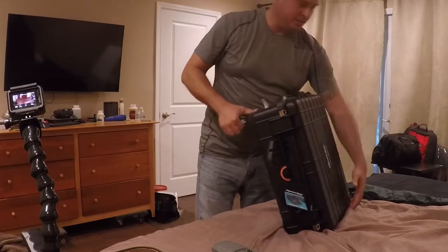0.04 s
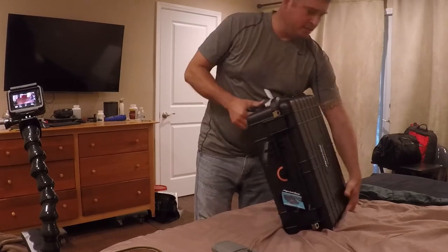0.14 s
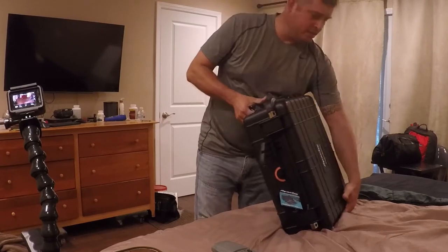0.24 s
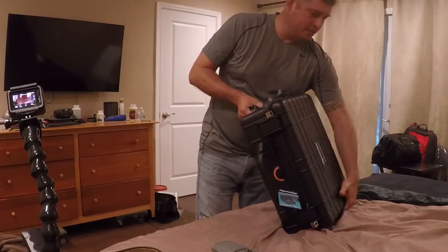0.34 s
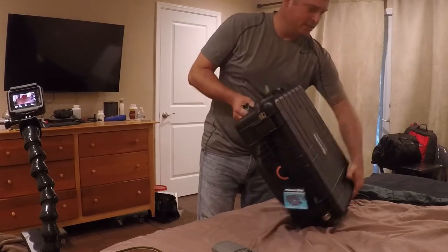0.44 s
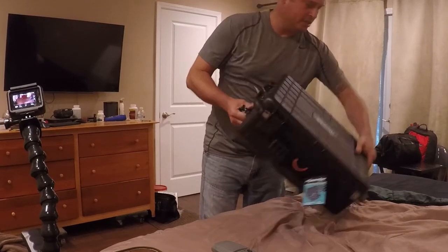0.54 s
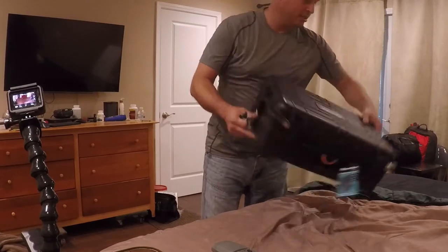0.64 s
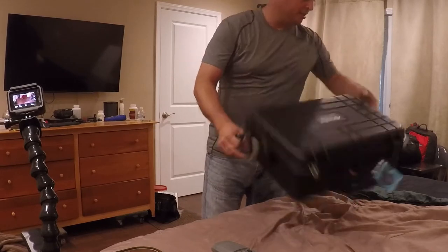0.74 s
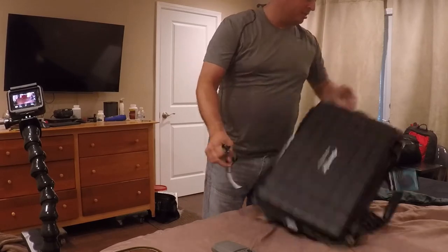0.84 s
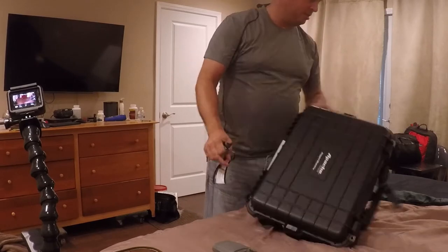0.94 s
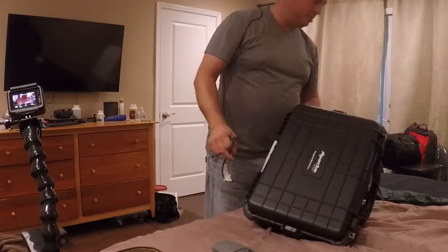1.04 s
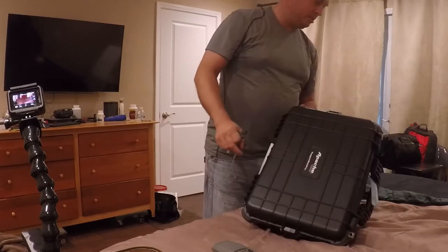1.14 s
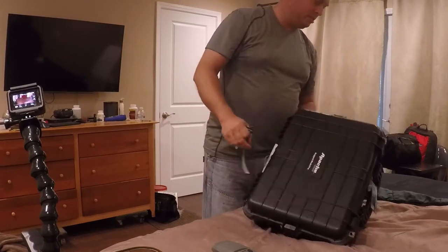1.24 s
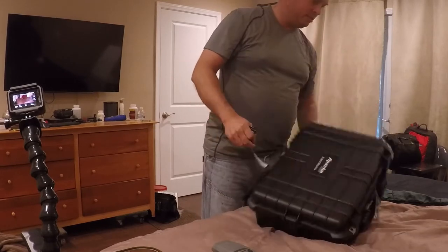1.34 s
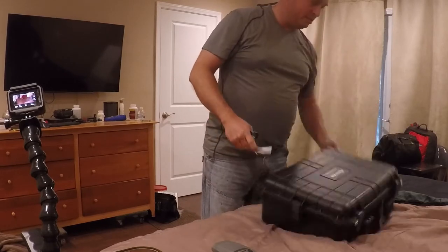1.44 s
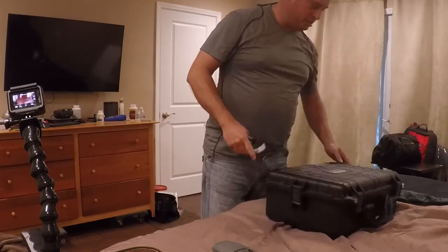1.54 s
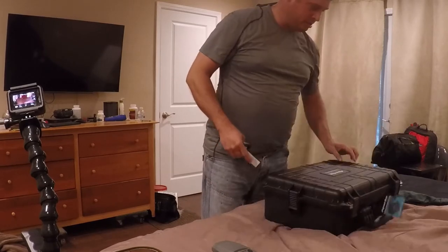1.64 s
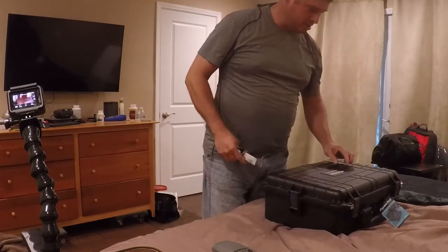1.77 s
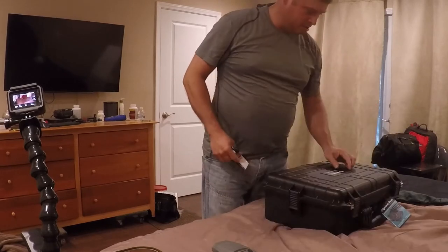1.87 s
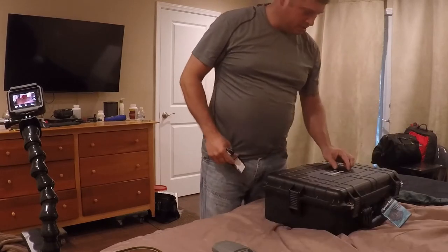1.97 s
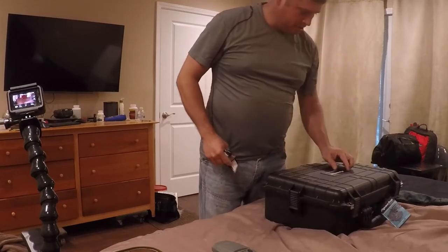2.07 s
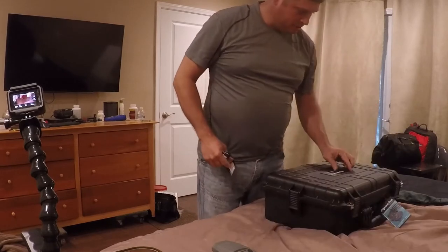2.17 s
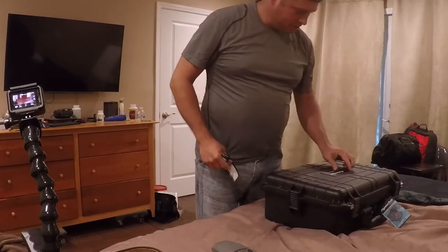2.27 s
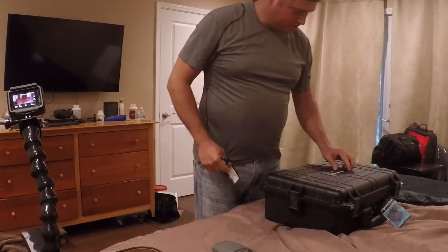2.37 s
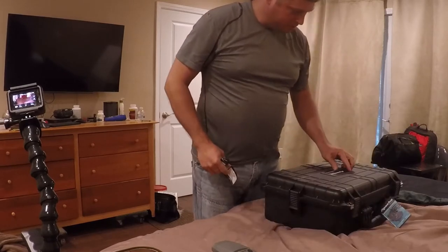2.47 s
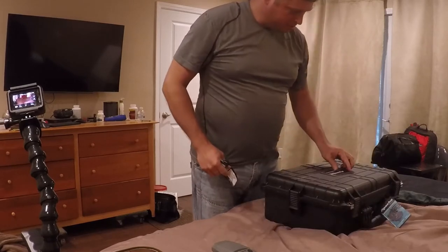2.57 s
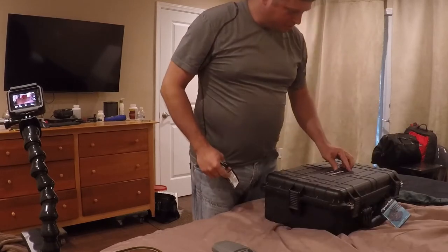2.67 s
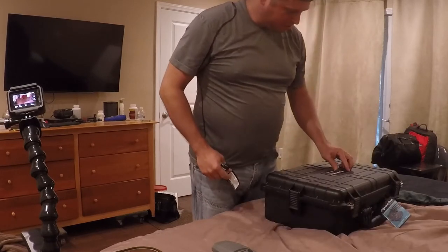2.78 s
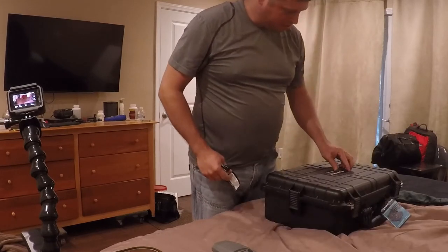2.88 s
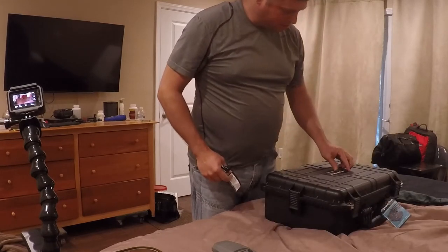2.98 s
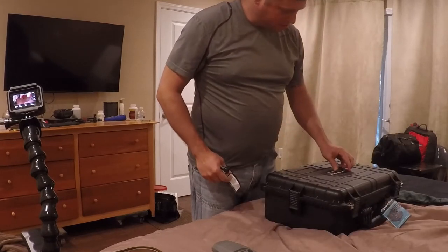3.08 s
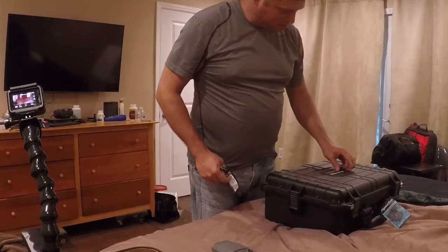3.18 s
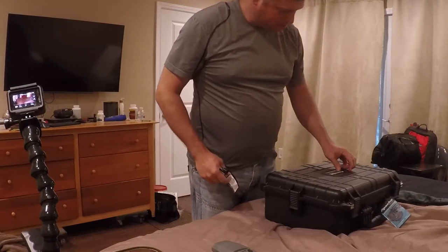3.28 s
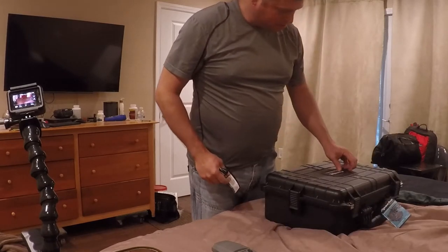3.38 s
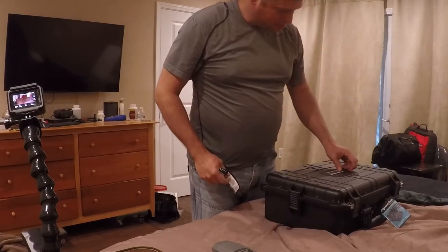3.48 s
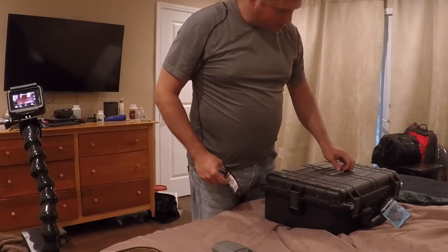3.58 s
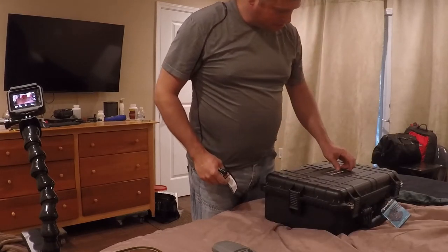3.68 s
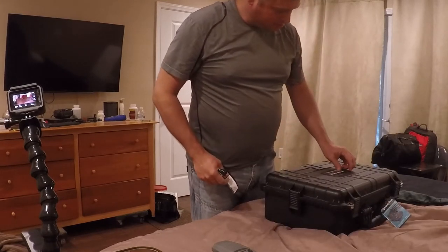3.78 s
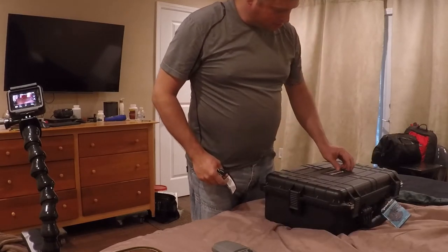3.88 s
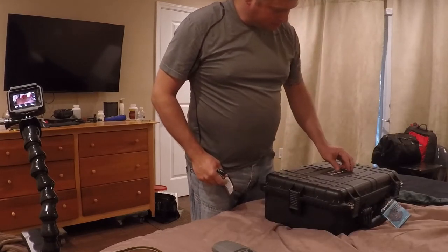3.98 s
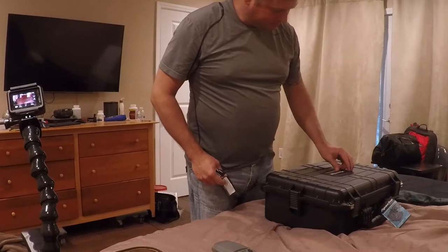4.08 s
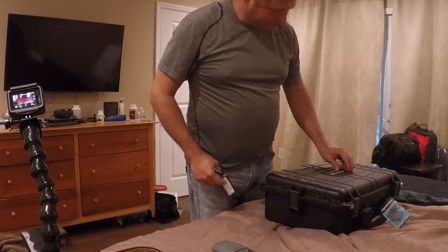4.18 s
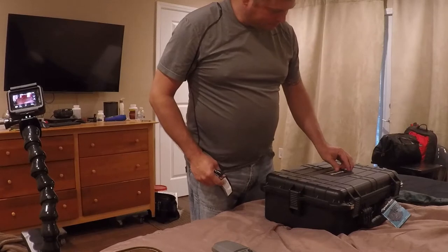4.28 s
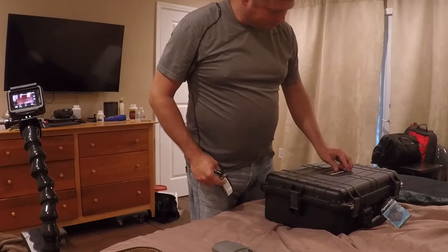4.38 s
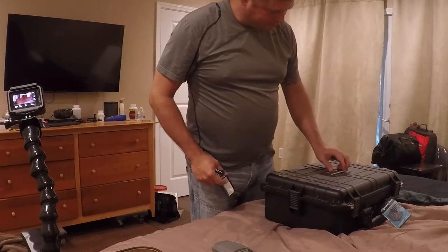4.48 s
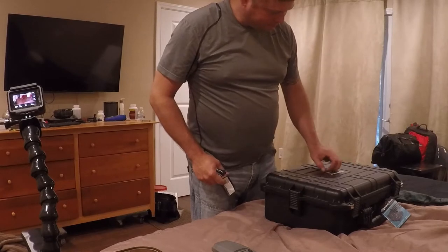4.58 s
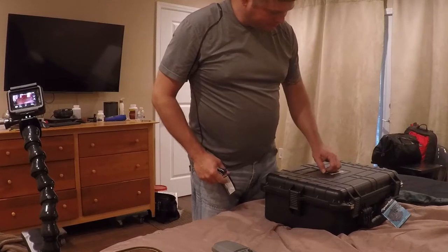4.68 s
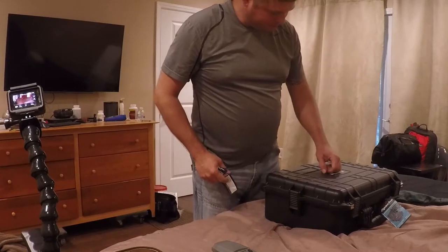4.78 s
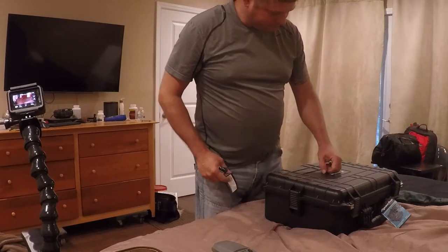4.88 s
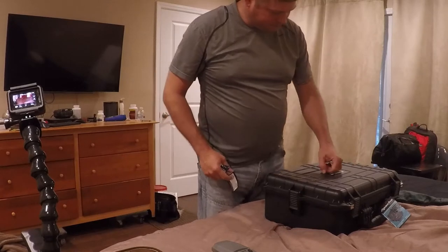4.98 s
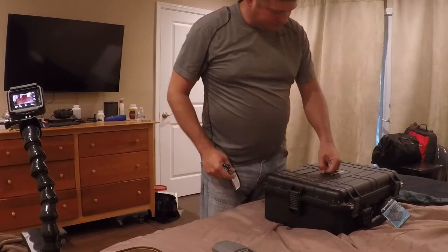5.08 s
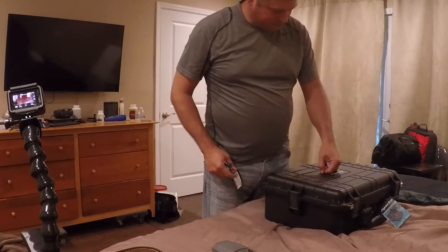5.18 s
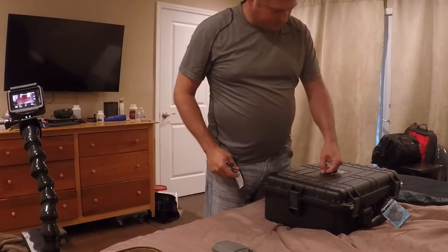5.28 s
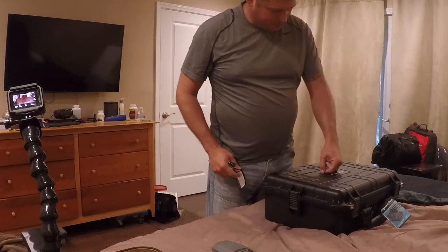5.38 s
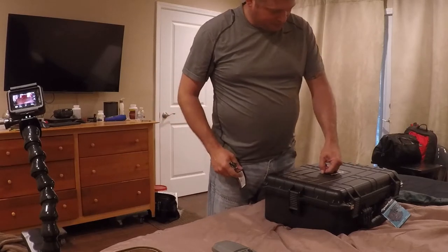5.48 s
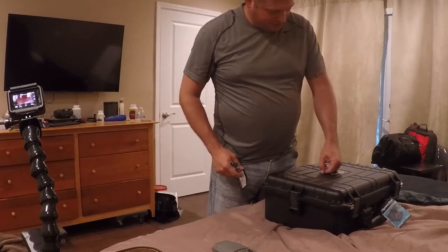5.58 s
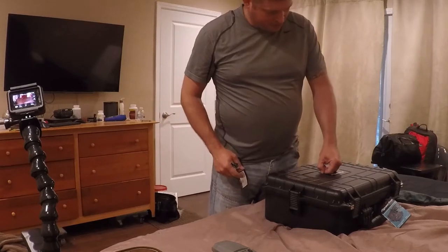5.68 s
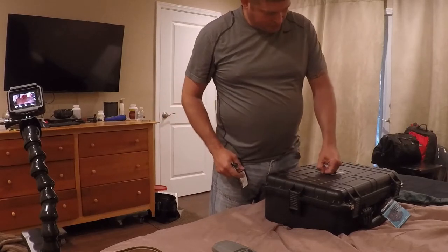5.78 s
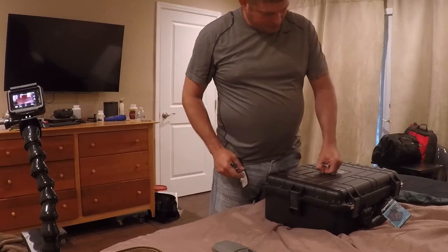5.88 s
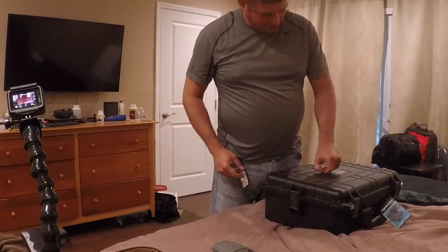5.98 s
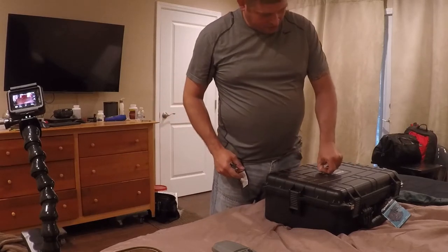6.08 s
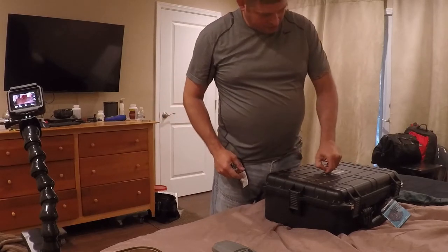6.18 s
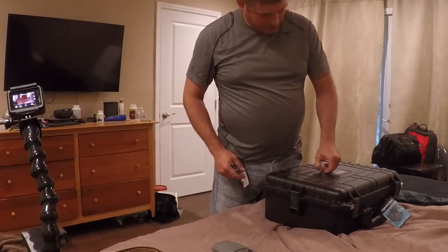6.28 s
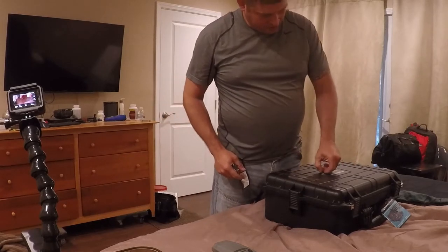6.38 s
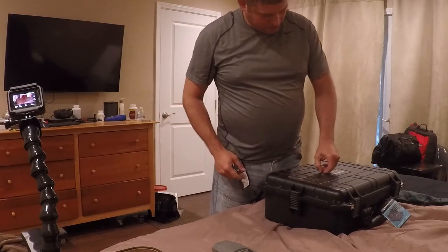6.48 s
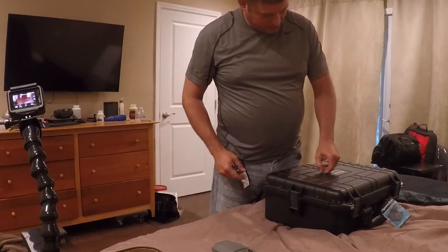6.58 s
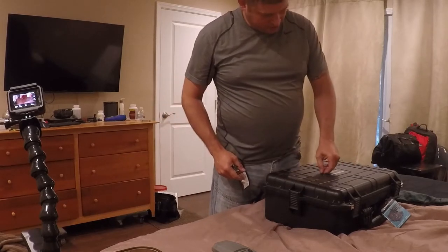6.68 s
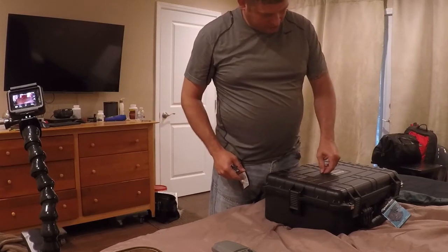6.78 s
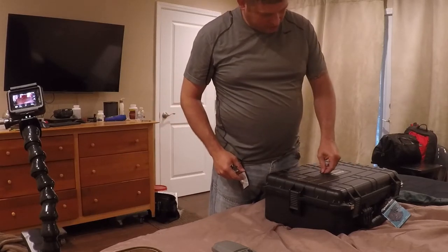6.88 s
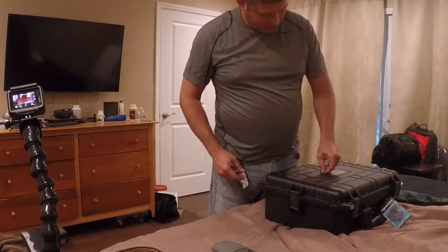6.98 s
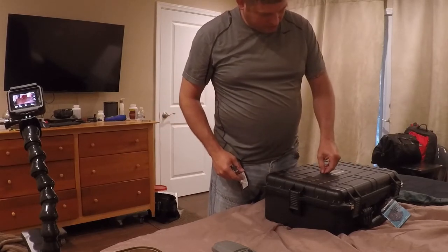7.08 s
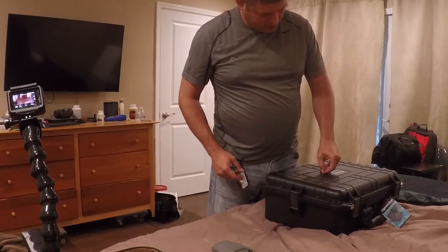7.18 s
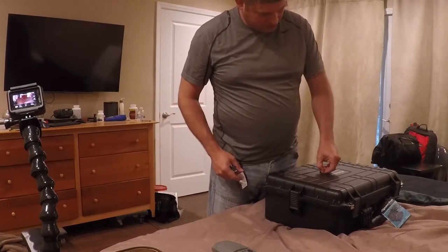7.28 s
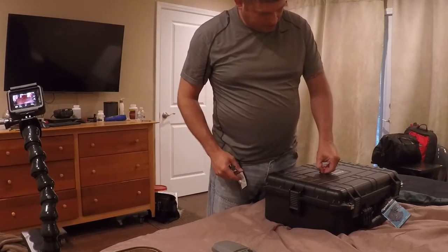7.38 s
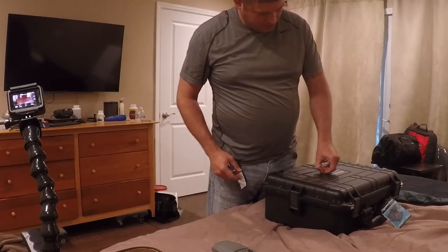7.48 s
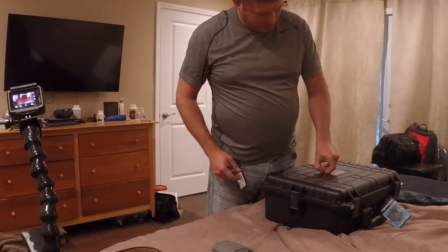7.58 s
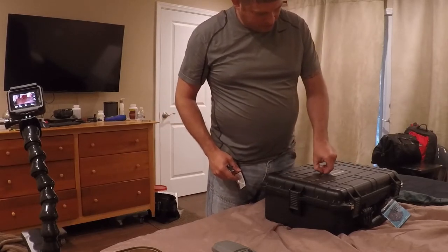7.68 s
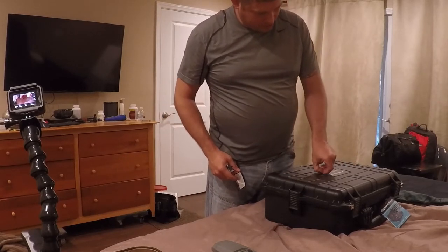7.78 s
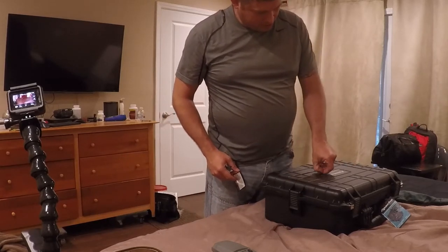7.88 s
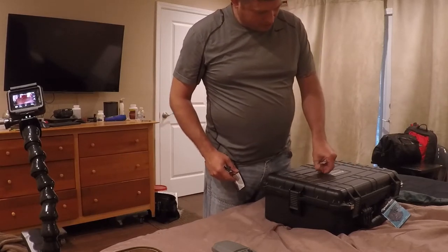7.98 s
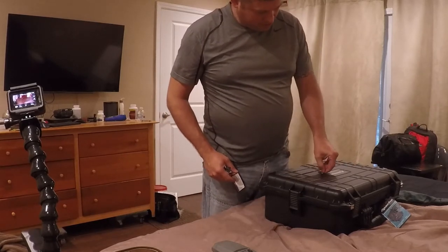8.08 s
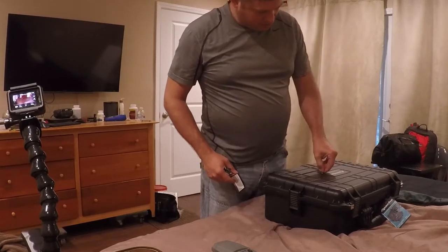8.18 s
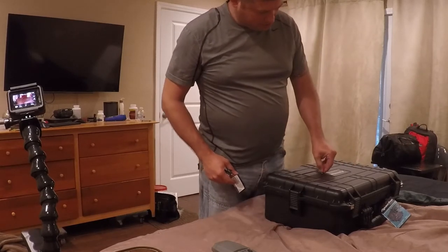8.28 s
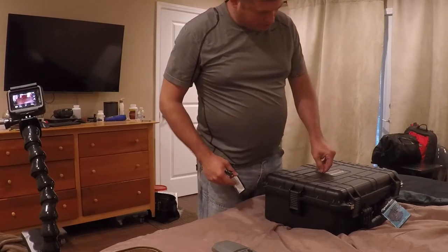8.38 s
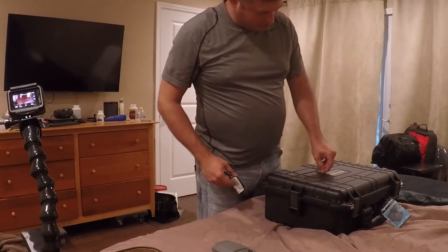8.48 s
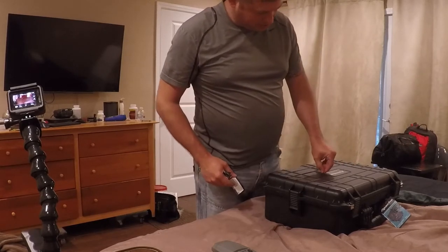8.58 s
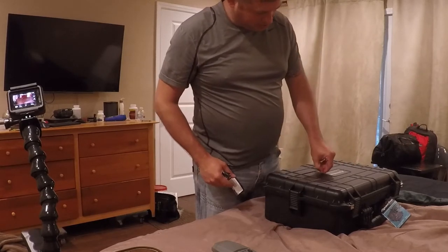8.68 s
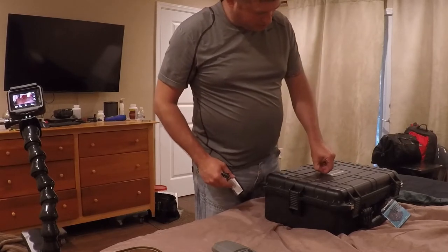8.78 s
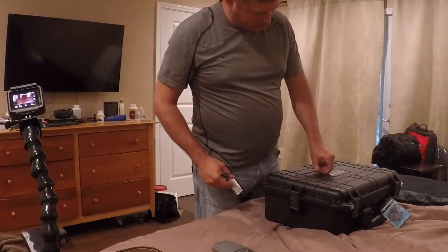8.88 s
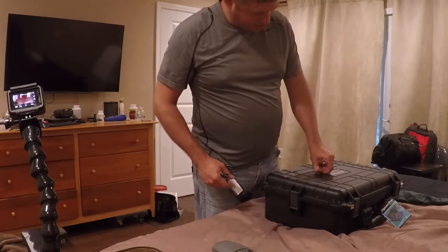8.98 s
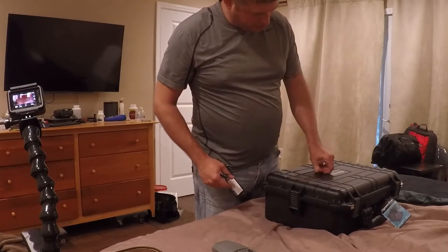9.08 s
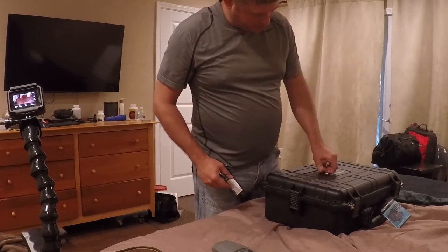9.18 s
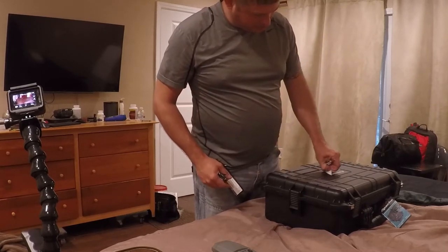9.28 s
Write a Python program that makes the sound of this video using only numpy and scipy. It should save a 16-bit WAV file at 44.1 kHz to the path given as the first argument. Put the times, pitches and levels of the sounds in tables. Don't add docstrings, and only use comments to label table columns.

```python
import sys
import numpy as np
from scipy import signal
from scipy.fft import rfft, irfft, next_fast_len
from scipy.io import wavfile
from scipy.ndimage import uniform_filter1d, map_coordinates

SR = 44100
rng = np.random.default_rng(int(sys.argv[2]) if len(sys.argv) > 2 else 0)


def linear_from_db(decibels):
    return 10 ** (np.asarray(decibels, float) / 20)


def waveform_to_disk(signal):
    frames = np.transpose(np.atleast_2d(signal))
    scaled = np.clip(frames, -1, 1) * 32767
    samples = np.round(scaled).astype(np.int16)
    wavfile.write(sys.argv[1], SR, samples)


N = 411894


def unit(x):
    return x / np.sqrt(np.mean(x ** 2) + 1e-20)


def along(points, hz):
    f, v = np.transpose(points)
    return np.interp(np.log(hz + 1), np.log(f + 1), v)


def curves(rows):
    s, *columns = np.transpose(rows)
    return [np.interp(np.arange(N) / SR, s, c, -150, -150) for c in columns]


def wobble(rate):
    knots = rng.standard_normal(int(N * rate / SR) + 4)
    return map_coordinates(knots, [np.arange(N) * rate / SR])


def filtered(x, response):
    m = next_fast_len(x.shape[-1] + SR // 4)
    spectrum = rfft(x, m) * response(np.fft.rfftfreq(m, 1 / SR))
    return irfft(spectrum, m)[..., :x.shape[-1]]


def coloured(x, spectrum):
    return unit(filtered(x, lambda hz: linear_from_db(along(spectrum, hz))))


def resonant(modes):
    def mode(f, hz, width_hz, db):
        damping = 1j * f * width_hz
        return linear_from_db(db) * damping / (hz * hz - f * f + damping)
    return lambda f: sum((-1) ** k * mode(f, *row) for k, row in enumerate(modes))


def slips(rate, spread_db):
    size = linear_from_db(spread_db * np.minimum(rng.exponential(size=N), 3)) * rng.uniform(-1, 1, N)
    return size * (rng.random(N) < rate / SR)


def shares(lid_db, fizz_db=-16, paper_db=-1.5, paper_per_lid=0.25):
    flutter_db = min(paper_db + paper_per_lid * lid_db, 17.5)
    return linear_from_db([[0], [flutter_db], [lid_db], [fizz_db]])


def stroke(gains, s, rise_s, hold_s, fall_db_per_s, level):
    t = np.arange(SR // 2) / SR
    rise = np.minimum(t / max(rise_s, .001), 1) ** 2
    shape = rise * linear_from_db(-fall_db_per_s * np.maximum(t - rise_s - hold_s, 0))
    place = gains[:, max(round(s * SR), 0):][:, :len(t)]
    place += level * shape[:place.shape[1]]


# start in s, rise in s, crackle in dB, share through the lid in dB.
SCUFF_STROKES = [(0, 0.00073, -33, -8.5), (.098, 0.012, -40, -0.5), (.125, .02, -76, 2),
                 (.32, 0.006, -48.5, 0.5), (.41, 0.01, -60, -13), (.58, 0.0044, -52, 7.5),
                 (.74, 0.034, -39.5, -33), (.985, 0.019, -59, 25), (1.325, 0.013, -47, -3),
                 (1.47, 0.016, -49, -5), (1.58, 0.012, -65, -29), (1.705, 0.022, -49.5, 1),
                 (1.74, 0.025, -44, -12), (1.845, .004, -77, 27), (2.71, 0.0044, -50.5, -1),
                 (3.49, 0.0056, -55, 6.5), (3.6, 0.021, -58.5, 6), (3.795, 0.013, -53, 1),
                 (3.95, 0.0046, -59.5, 10.5), (4.43, 0.013, -53, 8), (4.49, 0.024, -60, 9),
                 (4.56, 0.036, -55, -1), (5.35, 0.045, -53.5, 2.5), (5.43, 0.035, -66, 3.5),
                 (5.616, 0.0068, -70, 24), (5.985, .005, -63, 7)]


def scuffs(gains):
    for s, rise_s, db, lid_db in SCUFF_STROKES:
        stroke(gains, s, rise_s, 0, 189, linear_from_db(db - 8.5) * shares(lid_db))


# time in s, crackle in dB.
DRAG_LEVEL = [
    (0, -57),
    (.2, -55),
    (.28, -57.5),
    (.55, -55.5),
    (.8, -54.5),
    (1.0, -58),
    (1.25, -67),
    (1.6, -58.5),
    (2.1, -70),
]


def drag():
    level_db, = curves(DRAG_LEVEL)
    return linear_from_db(level_db - 4.5) * shares(lid_db=3)


# frequency in Hz, density in dB per Hz.
HISS_MID_COLOUR = [(15, -44), (25, -19), (82, -37), (137, -5.5), (200, -0.5), (394, -9), (695, -14),
                   (1520, -17), (1650, -18), (5000, -26.5), (5880, -23), (9070, -25), (12200, -32.5),
                   (14800, -40.5), (16000, -69)]
# frequency in Hz, density in dB per Hz.
HISS_SIDE_COLOUR = [(15, -67), (25, -39), (111, -16), (137, -16), (157, -1), (317, -6), (354, -7),
                    (677, -7.5), (734, -7.5), (818, -6.5), (1610, -16.5), (3820, -32), (10100, -28),
                    (14400, -45), (16000, -57)]


def hiss():
    mid, side = rng.standard_normal((2, N))
    mid = linear_from_db(4.5) * coloured(mid, HISS_MID_COLOUR)
    side = linear_from_db(9.5) * coloured(side, HISS_SIDE_COLOUR)
    return linear_from_db(-58.5) * np.array([mid, side])


# centre in Hz, width in Hz, level in dB.
SHELL_MODES = [(165, 29, -3.5), (194, 9.4, 0.5), (263.3, 40, -1), (305, 78, -6.5), (381, 37, -3.5),
               (501, 59, -10), (668, 600, -9.5)]
# frequency in Hz, density in dB per Hz.
SLAP_COLOUR = [(200, -18), (400, 9), (700, -3.5), (1200, -7), (2000, -13.5), (2600, -19.5), (4000, -16),
               (7000, -45), (12000, -63)]
# start in s, peak in dB, pitch in Hz, hardness in dB.
BED_BUMPS = [(0.056, -39, 280, -11), (0.116, -34, 240, -16), (0.186, -33.5, 224, -15),
             (0.647, -14, 241, -20), (0.673, -27, 284, -11), (.699, -28.5, 263, -14),
             (0.734, -31, 202, -23), (0.827, -33, 215, -4.5), (0.849, -28.5, 200, -7.5),
             (0.896, -19.5, 227, -34), (0.911, -25.5, 199, -28), (0.938, -23, 224, -17),
             (0.9792, -3.5, 283, -10.5), (0.986, -9, 253, -23), (1.009, -8.5, 190, -15.5),
             (1.031, -15, 268, -7), (1.054, -18, 342, -8), (1.067, -20, 300, -11.5),
             (1.231, -37.5, 154, -24), (1.386, -24, 221, -19), (1.401, -38, 252, -7),
             (1.421, -41, 239, -10), (1.468, -32.5, 240, -27), (1.481, -23.5, 240, -10),
             (1.504, -33, 260, -4), (1.545, -41, 253, -20), (1.755, -13.5, 238, -14.5),
             (1.767, -12.5, 230, -14), (1.79, -21.5, 197, -16), (1.955, -41, 157, -11),
             (2.032, -39, 215, -25)]
# start in s, peak in dB, pitch in Hz, hardness in dB.
LID_PUSHES = [(2.812, -43, 230, -16), (2.823, -28, 223, -26), (2.844, -40, 243, -21),
              (3.483, -41, 200, -25), (3.494, -20, 219, -19), (3.515, -24, 187, -23),
              (3.546, -35, 170, -11.5), (3.664, -26, 217, -24), (3.9, -33, 229, -30),
              (4.599, -28.5, 197, -22), (4.612, -18, 223.7, -25.5), (4.634, -24.5, 205, -23),
              (4.667, -30, 199, -22.5), (4.841, -32.5, 265, -17), (4.856, -29, 267, -22),
              (5.6176, -22, 292, -10.5), (5.626, -29.5, 279, -15), (6.255, -28.5, 241, -19),
              (8.178, -33.5, 195, -20), (9.11, -33, 236, -24), (9.138, -33, 270, -17),
              (9.244, -31.5, 192, -21), (9.264, -31, 194, -21), (9.276, -29.5, 200, -21),
              (9.297, -28.5, 191, -17), (9.312, -32, 200, -18)]
# start in s, peak in dB, pitch in Hz.
LID_TAPS = [(2.525, -38.5, 232), (2.554, -37, 262), (2.711, -42, 239), (2.919, -37, 255),
            (3.013, -37.5, 222), (3.688, -36.5, 264), (3.957, -40, 230), (4.034, -39, 256),
            (4.086, -36.5, 205), (4.188, -37.5, 217), (4.413, -34.5, 212), (4.512, -34.5, 221),
            (4.756, -36, 270), (4.799, -35, 267), (5.091, -38, 266), (5.894, -41.5, 210), (5.991, -35, 220),
            (6.056, -38.5, 224), (6.1, -40.5, 196), (6.289, -41, 310), (6.366, -39, 257), (6.451, -41, 200),
            (6.896, -37, 220), (8.028, -39.5, 231)]
BUMP_T60_S, PUSH_T60_S, TAP_T60_S, TAP_HARD_DB = 0.062, 0.041, 0.07, -16.5
DAMP_DB_PER_HARD_DB = 0.32


def knocks():
    out, t = np.zeros(N + SR), np.arange(SR // 6) / SR
    slap = coloured(rng.standard_normal(N + SR), SLAP_COLOUR)
    slap_fade = linear_from_db(-60 * t / 0.042) * (1 - np.exp(-t / 0.00053))
    rows = [(*row, BUMP_T60_S) for row in BED_BUMPS]
    rows += [(*row, PUSH_T60_S) for row in LID_PUSHES]
    rows += [(*row, TAP_HARD_DB, TAP_T60_S) for row in LID_TAPS]
    chance = rng.standard_normal((len(rows), 2, len(SHELL_MODES)))
    for (s, db, hz, hard_db, t60_s), (level, detune) in zip(rows, chance):
        rise_s = 0.0014 * linear_from_db(-.4 * (hard_db + 9))
        damped_t60_s = t60_s * linear_from_db(-DAMP_DB_PER_HARD_DB * (hard_db + 16.0))
        fade = linear_from_db(-60 * t / damped_t60_s) * (1 - np.exp(-t / rise_s)) ** 2
        ring = np.sin(2 * np.pi * hz * t)
        for (mode_hz, _, mode_db), a, b in zip(SHELL_MODES, level, detune):
            tilt_db = 1.04 * (hard_db + 11.5) * np.abs(np.log2(mode_hz / hz))
            mode = np.sin(2 * np.pi * mode_hz * (1 + 0.036 * b) * t)
            ring = ring + linear_from_db(mode_db - 6.5 + tilt_db + 3.5 * a) * mode
        boom = fade * ring
        k = round(s * SR)
        crack = linear_from_db(hard_db + 2.0) * slap_fade * slap[k:k + len(t)]
        out[k:k + len(t)] += linear_from_db(db + 0.5) * (0.81 * boom / np.abs(boom).max() + crack)
    return out[:N]


# start in s, peak in dB, centre in Hz, width share 0-1.
NAIL_TICKS = [(.103, -35, 2200, 0.9), (.323, -41, 2140, 0.46), (.581, -40, 2470, 0.8),
              (0.6338, -17, 8000, 1), (0.9224, -25.5, 6640, 0.23), (0.9768, -14.5, 1110, 1),
              (1.327, -35, 3150, 0.6), (1.3835, -28.5, 1310, 1), (1.397, -22, 3500, 0.53),
              (1.41, -16.5, 6220, 0.14), (1.674, -35, 3130, 1), (1.754, -44, 1800, 0.5),
              (2.713, -50, 1980, .99), (3.398, -40.5, 1770, 0.5), (3.803, -38.5, 1580, 0.64),
              (4.188, -36, 3840, 0.6), (4.356, -44, 2820, 1), (4.445, -57, 2500, 0.6),
              (4.5715, -36.5, 3050, 0.57), (4.757, -42.5, 2320, .99), (5.034, -41.5, 3300, 1),
              (5.173, -41, 3700, 0.37), (5.331, -45, 1730, 1), (5.617, -29.5, 820, 0.94),
              (5.989, -42, 7100, 0.2), (6.858, -41, 2300, .99), (8.139, -45, 2500, 0.95),
              (9.1112, -32, 7250, .5), (9.137, -26, 7440, .6), (9.2405, -30, 3050, 0.4)]
# start in s, peak in dB, centre in Hz, width
MORE_TICKS = [(.427, -35, 5700, 0.2), (.6345, -14, 5300, .8), (0.9776, -17.5, 6200, 0.3),
              (1.645, -46, 6300, .3), (4.19, -43, 6400, 0.25), (4.578, -39, 6500, 0.5),
              (5.618, -41, 1550, 0.6), (5.627, -41, 1400, 0.8), (4.6, -44, 3400, 0.2),
              (6.858, -42, 6760, 0.3), (.984, -27, 1670, 0.08), (2.716, -44, 1160, 0.4),
              (2.715, -44, 6500, .4), (3.399, -41.5, 3000, 0.37), (3.9, -50, 3000, 0.7),
              (3.9, -42, 6700, .2), (5.176, -41, 7000, 0), (8.335, -45, 3500, .6), (8.3, -49, 4500, .6),
              (.115, -29, 7700, 0.7), (9.241, -29, 7100, 0.3), (2.82, -40.5, 6300, 0.7)]
# start in s, peak in dB, centre in Hz.
THREAD_CRACKS = [(.6403, -19, 6800), (0.642, -18, 7000), (0.646, -16, 7140), (.6525, -23, 3600),
                 (.66, -12.5, 3300), (.668, -28, 7000), (.678, -15, 3700), (.6825, -35, 5000),
                 (.6856, -13, 4400), (.6946, -18.5, 5000), (.6991, -12, 3560), (.7024, -27, 6000),
                 (0.7113, -13, 6000), (0.718, -16, 7300), (.7205, -12, 7000), (.7303, -17, 6400),
                 (0.734, -20, 7000), (0.741, -11, 7000), (.7535, -24, 6800), (1.403, -17, 4060),
                 (1.408, -24.5, 5200), (1.412, -33, 4500), (1.4192, -27, 6300), (1.423, -30, 3800),
                 (9.1185, -40, 7040), (9.1234, -41, 7600), (9.1306, -40, 7800), (9.1411, -21.5, 7500),
                 (9.1488, -31, 7000), (9.1532, -26, 7400), (9.1557, -22, 7300), (9.1643, -38, 7300),
                 (9.2472, -33, 2700), (9.251, -33, 3000), (9.2583, -24, 7000), (9.263, -31, 5000),
                 (9.266, -23.5, 3200), (9.2764, -30, 4100), (9.2814, -24, 6700), (9.2891, -38, 6000),
                 (9.2975, -22, 6840), (9.3027, -21.5, 3440), (9.3111, -24, 6600), (9.3144, -26, 6000),
                 (9.3189, -20, 5900), (9.3303, -31, 6400)]
CRACK_WIDTH_SHARE, CRACK_DB = 0.72, -0.5
TICK_T60_S, TICK_SHARP = .008, 2.5


def ticks():
    out, t = np.zeros(N + SR), np.arange(SR // 10) / SR
    cracks = [(s, db + CRACK_DB, hz, CRACK_WIDTH_SHARE) for s, db, hz in THREAD_CRACKS]
    rows = NAIL_TICKS + cracks + MORE_TICKS
    puffs = rng.standard_normal((len(rows), len(t))) * linear_from_db(-60 * t / TICK_T60_S)
    slip = 3 * TICK_SHARP * (t == 0)
    for (s, db, hz, share), puff in zip(rows, puffs):
        edge = resonant([(hz, max(share, .1) * hz, 0)])
        tone = filtered(puff + slip, lambda f: edge(f) ** 2 / (1 + 1j * f / hz / 0.64))
        out[round(s * SR):][:len(t)] += linear_from_db(db + 5.0) * tone / np.abs(tone).max()
    return out[:N]


# time in s, level in dB.
PRESS_LEVEL = [(0.0, -80), (0.57, -45.5), (0.72, -63), (0.9, -29), (1.04, -51), (1.14, -50), (1.77, -48),
               (2.34, -59), (2.65, -51), (3.09, -57.5), (3.74, -51), (4.47, -49.5), (4.68, -47),
               (4.95, -55), (6.4, -58), (6.65, -54.5), (9.1, -61.5), (9.34, -41)]


def press():
    level_db, = curves(PRESS_LEVEL)
    nudges = slips(400, spread_db=2) * linear_from_db(2 * wobble(14))
    shell = resonant(SHELL_MODES)
    return linear_from_db(level_db - 4) * unit(filtered(nudges, lambda f: shell(f) / (1 + (f / 450) ** 4)))


# start in s, rise in s, hold in s, crackle in dB, share through the lid in dB.
LABEL_RIPS = [
    (0.632, 0.00092, 0.029, -26.5, -14.5),
    (0.669, 0.014, 0.048, -27.5, -10),
    (0.915, 0.0036, .005, -53, -10),
    (0.984, 0.00092, 0.0018, -47, -1),
    (1.393, 0.0074, .01, -35, -4.5),
    (9.107, 0.02, .005, -44, -25),
    (9.134, 0.0078, 0.026, -33, -38),
    (9.241, 0.0046, 0.03, -43, -8),
    (9.245, 0.034, 0.047, -33.5, -6.5),
]


def rips(gains):
    for s, rise_s, hold_s, db, lid_db in LABEL_RIPS:
        level = linear_from_db(db - 5) * shares(lid_db, fizz_db=-15, paper_db=0, paper_per_lid=0.62)
        stroke(gains, s, rise_s, hold_s, 300, level)


# time in s, crackle in dB.
CREEP_LEVEL = [
    (8.78, -72),
    (8.9, -72),
    (9.11, -67.5),
]


def creep():
    level_db, = curves(CREEP_LEVEL)
    return linear_from_db(level_db) * shares(lid_db=-30, fizz_db=0)


# frequency in Hz, density in dB per Hz.
GLUE_COLOUR = [(2060, -34), (3500, -16.5), (5210, -14.5), (6010, -2.5), (7390, -3), (8530, -13),
               (11000, -24.5), (14300, -63), (22000, -120)]
# frequency in Hz, density in dB per Hz.
PAPER_COLOUR = [(1500, -35), (2300, 0), (3200, 2), (4300, -1.5), (5200, -5), (7000, -41.5)]
# frequency in Hz, density in dB per Hz.
LID_COLOUR = [(400, 0.5), (700, -6), (1300, 3), (2000, 1), (2800, -13), (4000, -58)]
# frequency in Hz, density in dB per Hz.
FIZZ_COLOUR = [(8500, -7), (10000, 8), (11500, -13), (13500, 1.5), (15200, -15)]


def crackle():
    clumps = linear_from_db(2.1 * wobble(200) + 1.0 * wobble(60) + .8 * wobble(25))
    snaps = clumps * (unit(slips(2600, spread_db=2)) + 1.7 * rng.standard_normal((4, N)))
    colours = (GLUE_COLOUR, PAPER_COLOUR, LID_COLOUR, FIZZ_COLOUR)
    layers = np.array([coloured(x, colour) for x, colour in zip(snaps, colours)])
    gains = drag() + creep()
    scuffs(gains)
    rips(gains)
    return (gains * layers).sum(axis=0)


# frequency in Hz, t60 in s.
ROOM_T60 = [(120, 0.28), (300, 0.22), (800, 0.31), (3000, 0.22), (8000, 0.22), (14000, 0.057)]
# frequency in Hz, side over mid in dB.
ROOM_WIDTH = [(60, -24), (110, -6), (200, -24), (380, -14), (700, 1), (1290, 2), (2380, -1.5), (4400, -3.5),
              (8120, 7), (15000, 4)]


def bedroom(x, size=SR // 5):
    out, x, fade = np.zeros((2, N + 2 * SR)), np.pad(x, size), np.hanning(2 * size)
    for k in range(0, N + size, size):
        hz, t, z = signal.stft(rng.standard_normal((2, SR // 2)), SR, nperseg=512)
        decay = linear_from_db(-60 * t / along(ROOM_T60, hz)[:, None])
        tail = rfft(signal.istft(z * decay, SR, nperseg=512)[1])
        tail /= np.sqrt(uniform_filter1d(np.abs(tail) ** 2, size=24))
        tail[1] *= linear_from_db(along(ROOM_WIDTH, np.linspace(0, SR / 2, tail.shape[1])))
        piece = x[k:k + 2 * size]
        piece = piece * fade[:len(piece)]
        wet = signal.fftconvolve(piece[None], irfft(tail)[:, :SR // 3], axes=1)
        out[:, k + 180:][:, :wet.shape[1]] += wet
    return out[:, size:N + size]


def sway(x, hz=136, t60_s=.25, rise_s=.06):
    t = np.arange(SR // 2) / SR
    mode = np.sin(2 * np.pi * hz * t) * linear_from_db(-60 * t / t60_s) * (1 - np.exp(-t / rise_s)) ** 2
    return signal.fftconvolve(x, mode / np.linalg.norm(mode))[:N]


def ducking(x, knee_db=-34, slope=0.052, release_s=0.052):
    level_db = 10 * np.log10(np.abs(uniform_filter1d(x ** 2, 900)) + 1e-12)
    over_db = np.maximum(level_db - knee_db, 0)
    pole = np.exp(-1 / (release_s * SR))
    return linear_from_db(-slope * 0.52 * signal.lfilter([1 - pole], [1, -pole], over_db))


def bass_cut(f):
    ratio = f / 138
    return ratio ** 14 / (1 + ratio ** 28) ** .5 + linear_from_db(-24.5)


def hiss_notch(f):
    return 1 - .85 * np.exp(-((f - 108) / 14) ** 2)


# frequency in Hz, side over mid in dB, side lag in rad.
PORT_LEAN = [(170, -25, 1.8), (350, -18, 2), (600, -13, 2.3), (950, -7, 4.3), (1900, -4, 4.7),
             (3500, -12, 4.7), (8300, 1, 4.3), (12000, -26, 3.2)]


def lean(f):
    level_db = along([(hz, db) for hz, db, _ in PORT_LEAN], f)
    lag_rad = along([(hz, rad) for hz, _, rad in PORT_LEAN], f)
    return linear_from_db(level_db) * np.exp(-1j * lag_rad)


def scene():
    low, tear, nail = knocks() + press(), crackle(), ticks()
    sound = bedroom(linear_from_db(-3.5) * low + linear_from_db(-2.5) * tear + linear_from_db(-5.5) * nail)
    sound[0] += linear_from_db(-1.0) * low + linear_from_db(2.0) * tear + linear_from_db(-4.0) * nail
    sound = filtered(sound, bass_cut)
    sound[1] = linear_from_db(-2.0) * sound[1] + filtered(sound[0], lean) + linear_from_db(-43.0) * sway(low)
    noise = ducking(sound[0]) * hiss()
    mid, side = sound + filtered(noise, hiss_notch)
    return np.array([linear_from_db(-0.45) * (mid + side), mid - side])


def low_pass(x):
    return signal.sosfilt(signal.butter(12, 16470, fs=SR, output="sos"), x)


def record(dry):
    mix = filtered(dry, lambda f: np.where(f < 15250, 1, linear_from_db(-32)))
    return low_pass(mix)


dry = scene()
out = record(dry)
waveform_to_disk(out)
```